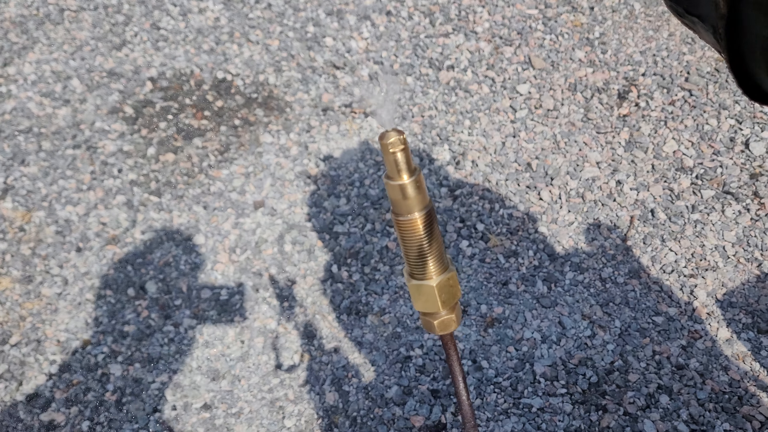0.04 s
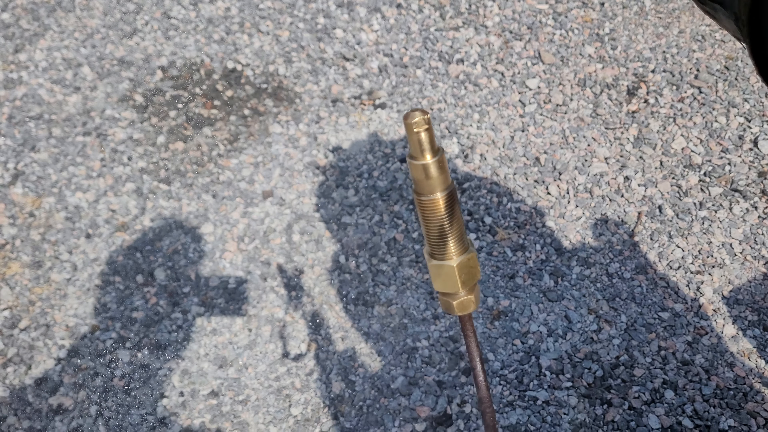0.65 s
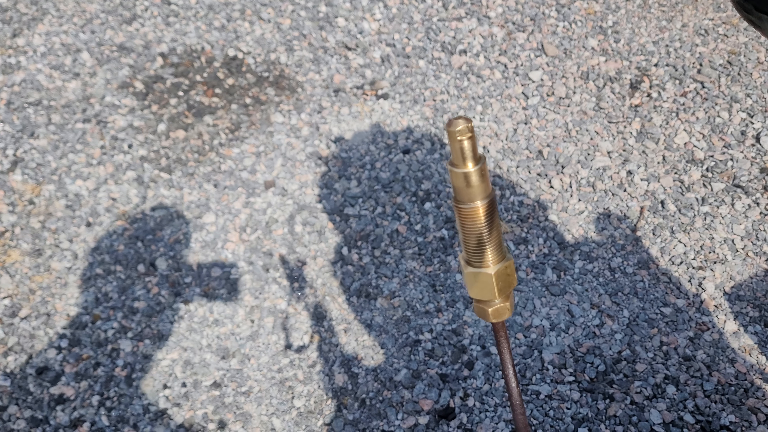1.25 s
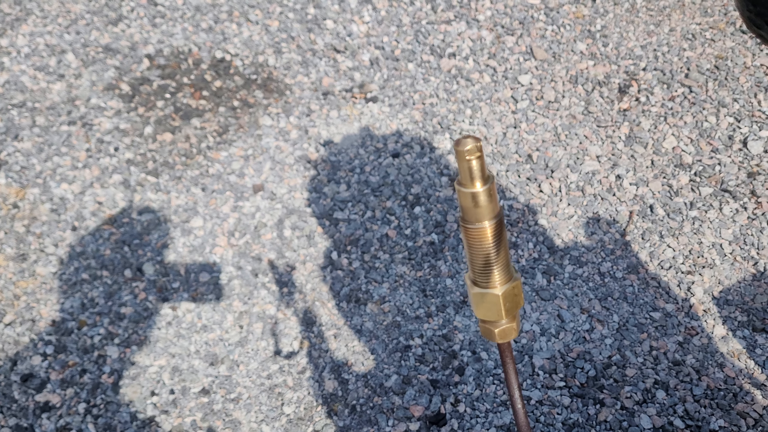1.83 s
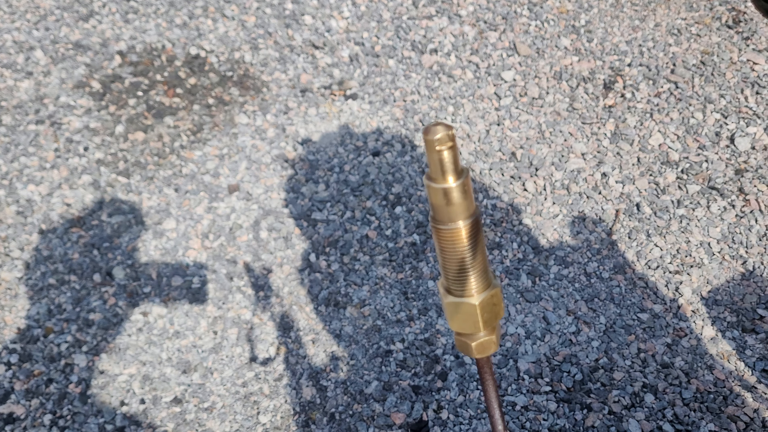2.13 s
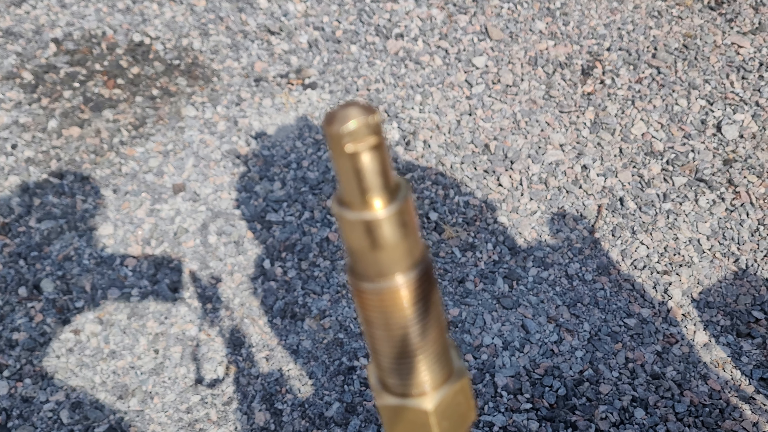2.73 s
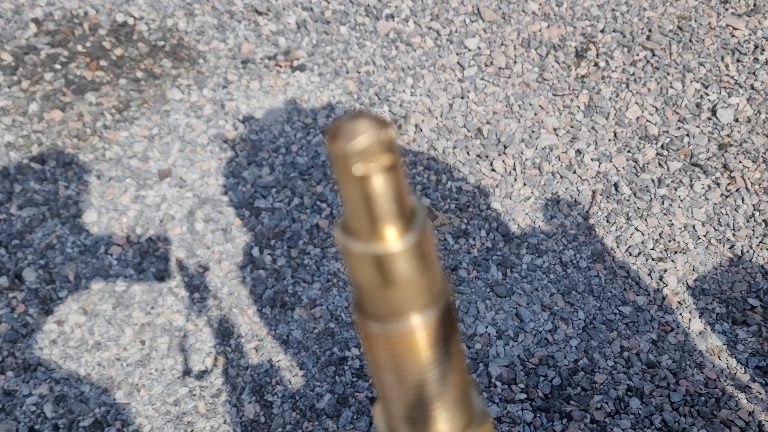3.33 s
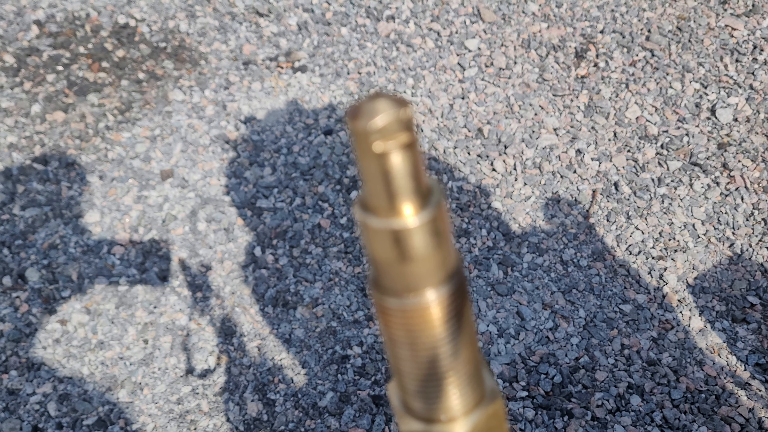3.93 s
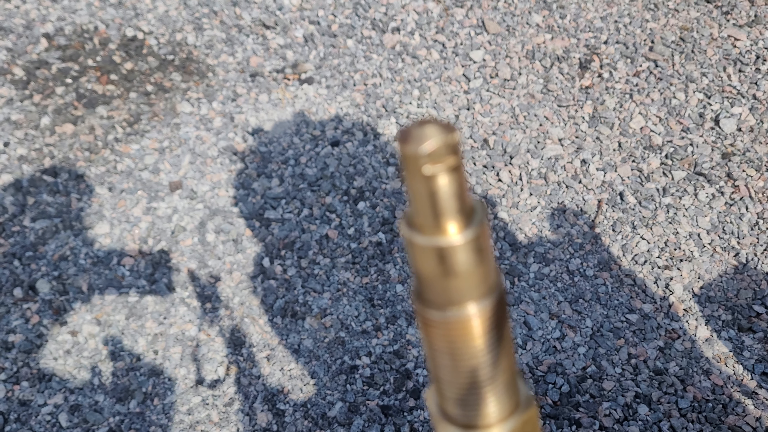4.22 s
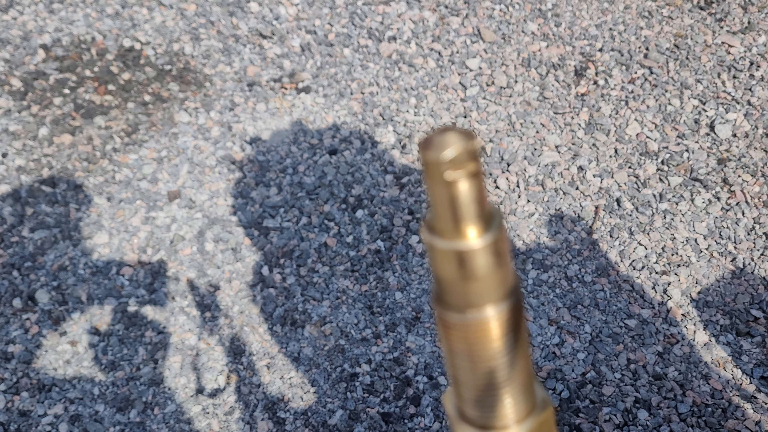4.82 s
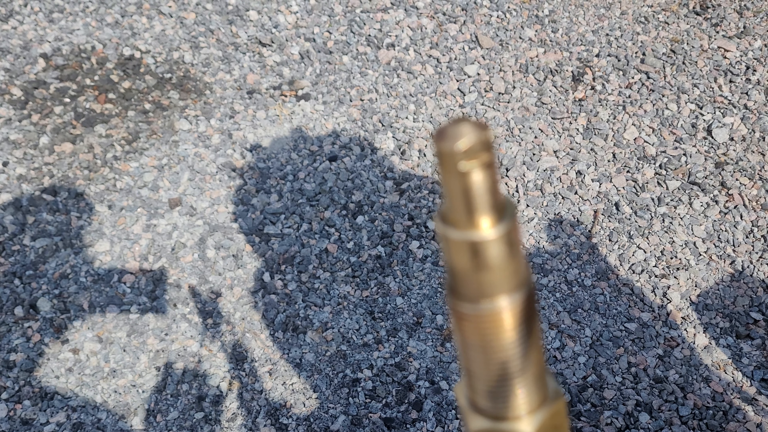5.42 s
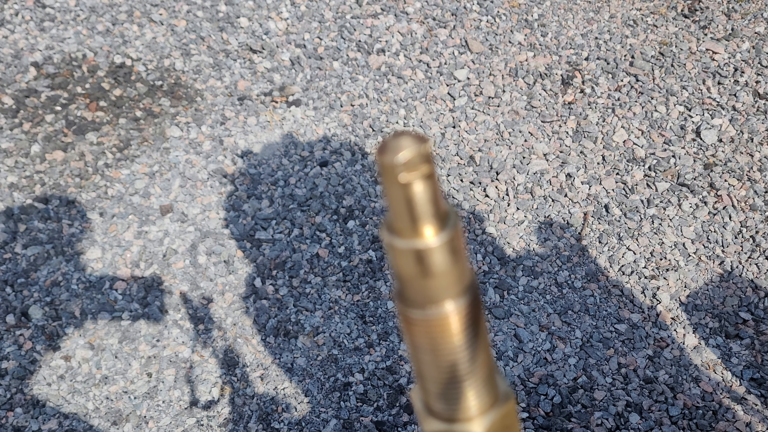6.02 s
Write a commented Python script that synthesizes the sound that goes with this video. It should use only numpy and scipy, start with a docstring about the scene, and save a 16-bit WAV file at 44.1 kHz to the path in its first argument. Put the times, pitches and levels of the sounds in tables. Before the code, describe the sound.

Outdoors, close to the microphone, a fuel injector on a hand pump opens with a metallic ping, gives a short, slightly rising squeal with a hiss of spray, and snaps shut. The pump lever clacks back with a few light ticks. The rest is a quiet yard: soft finger bumps on the microphone, a brief low buffet of wind, faint clothing rustle and barely audible birds and insects.

```python
"""A diesel injector popped once

On a hand test pump, outdoors over gravel, the needle cracks open with a ping, chatters in a short
rising squeal while fuel sprays, and snaps shut; the pump lever clacks back. Impacts excite free
vibration of the steel; the periodic bounces drive its resonances. Then a quiet yard: far birds and
insects, clothing, fingers shifting on the recorder's case, puffs of wind on its two microphones."""
import sys
import numpy as np
from scipy import signal
from scipy.fft import rfft, irfft, next_fast_len
from scipy.io import wavfile
from scipy.ndimage import uniform_filter1d

SR = 44100
rng = np.random.default_rng(int(sys.argv[2]) if len(sys.argv) > 2 else 0)


def store_wav(level_fs):
    """Save 16-bit WAV to argv[1]."""
    pcm = np.round(np.clip(np.atleast_2d(level_fs), -1, 1) * 32767)
    wavfile.write(sys.argv[1], SR, pcm.T.astype(np.int16))


N = 267246
T = np.arange(N) / SR
SIDES = np.array([[1], [-1]])  # left, right; a balance is left level minus right level
LIFT_S, SEAT_S = .151, .2865  # the needle chatters between these times

# Spectra of outdoor hush, cloth and fuel mist. Each row: frequency in Hz, spectral density in dB.
HUSH_SPECTRUM = [(20, -8), (55, 7.5), (110, -4), (180, -14.5), (300, -6.5), (500, -4), (800, -13.5),
                 (1200, -22.5), (2300, -20), (3700, -5), (5500, -19), (8000, -23.5), (11000, -29),
                 (15500, -33)]
CLOTH_SPECTRUM = [(100, -12.5), (310, -6), (600, -9.5), (1600, -15.5), (2600, -19.5), (5000, -15.5),
                  (10000, -32.5), (15000, -37.5)]
MIST_SPECTRUM = [(150, -13), (300, -3.5), (700, -4), (1800, -6.5), (3200, 1), (5000, -3.5), (8000, -8),
                 (11000, -2.5), (14000, 2), (16000, 4)]
# Direction of hush and mist. Each row: frequency in Hz, balance in dB.
HUSH_BALANCE = [(60, 2), (400, 9.5), (1200, 24), (3500, 7.5), (6000, -5), (12000, -7.5)]
MIST_BALANCE = [(1000, 0), (4000, -2), (8000, -1.5), (14000, -14)]
# Likeness of the two channels in hush and cloth. Each row: frequency in Hz, correlation.
YARD_CORRELATION = [(60, 0.45), (350, .55), (1200, 0.36), (3000, 0), (12000, 0)]
# Smooth swells of noise. Each row: peak time in seconds, level in dB, half-width in seconds.
PUFF_AND_RUSTLES = [(0, -55.5, 0.042), (.3, -71.5, 0.42), (1.5, -76.5, 0.19), (2.13, -75, 0.31),
                    (2.8, -70.5, 0.4), (4.15, -79, 0.17)]  # the first row is a brief puff of noise at the very start
FIZZES = [(.7, -69, 0.042)]
BREEZE = [(2.1, -67.5, 1.2)]
SLEEVE_SWISHES = [(2.17, -80.5, .2), (2.56, -82, .08), (2.93, -87, .14), (3.945, -77, .04)]
INSECT_SWELLS = [(5.12, -72, 0.33), (6.05, -78, 0.23)]
# The needle opens and shuts, the lever lands twice. Each row: start and T60 in seconds, crack level
# in dB, centre in Hz and balance in dB, sizzle level in dB and centre in Hz, thud level in dB.
METAL_CONTACTS = [(.075, 0.041, -39, 3600, -18, -32, 11500, -41.5),
                  (0.2884, 0.027, -23, 2050, -1.5, -36.5, 8000, -46),
                  (.6283, 0.038, -33.5, 1700, 16, -35.5, 13000, -49),
                  (0.6399, 0.024, -26, 2400, 1.5, -36.5, 6200, -53.5)]
# Modes of injector and pipe, of needle seat and nozzle, and of pump frame and lever.
# Each row: frequency in Hz, level in dB, T60 in seconds.
STEEL_MODES = [(830, -20, .25), (970, -14, .14), (1252, -17, .5), (1346, -5, .16), (1420, -11, .2),
               (1962, -9, .28), (2304, -7, .26), (2397, -9, .14), (3370, -13, .22), (3871, -15, .14),
               (4150, -7, .05), (4355, -9, .08), (4605, -11, .18), (4845, -13, .2), (5606, -9, .15),
               (6848, -4, .065), (8786, -14, .075), (9249, -5, .05), (10090, -2, .06), (11065, 2, .065),
               (11880, -10, .06), (12720, -11, .065), (13190, -5, .045), (13790, -6, .045),
               (14400, -8, .06), (15390, -7, .04)]
SEAT_MODES = [(3031, -24, .22), (3200, -7, .016), (3500, 0, .024), (3750, -8, .014)]
FRAME_MODES = [(226, -13, .2), (286, -6, .13), (374, -11, .34), (436, -14, .22), (526, -7, .12),
               (660, -15, .18), (732, -11, .1), (880, 5, .11), (1010, -9, .08), (1300, -9, .12),
               (1425, -8, .17), (1716, -6, .1), (2045, -1, .08), (2222, 3, .08), (2330, 3, .09),
               (2579, -7, .11), (2766, 0, .12), (3068, -5, .1), (4403, -3, .06), (4820, -8, .05),
               (5660, -9, .05)]
# Blows on those three bodies. Each row: start in seconds, level in dB, balance in dB.
STEEL_PINGS = [(0.077, -29, -8.5), (0.288, -56, 2.5), (0.6308, -57, 11)]
SEAT_SNAPS = [(0.2877, -17, 11.5)]
FRAME_KNOCKS = [(0.2891, -38.5, 1.5), (.629, -38.5, -7.5), (0.6399, -34, 4.5)]
# Decay of the echoes. Each row: frequency in Hz, T60 in seconds.
ECHO_T60 = [(100, .45), (400, .55), (1400, .3), (3000, .3), (6000, .22), (15000, .13)]
# Spectrum of the echoes. Each row: frequency in Hz, level in dB.
ECHO_SPECTRUM = [(100, -3.5), (400, -6), (1400, 4), (3000, -9.5), (6000, -7.5), (15000, -19)]
# Resonances that shape the squeal. Each row: centre and half-width in Hz, left and right levels
# in dB, phase lead of the left channel in radians.
INJECTOR_RESONANCES = [(1440, 27, -27.5, -15, 2.3), (1476, 13, -13.5, -24, 3.0), (1515, 19, -25.5, -26, .7),
                       (3010, 110, -35, -32, -1.3), (4370, 100, -29, -35, .6), (6030, 200, -52, -47, 0),
                       (7560, 150, -62, -56, 0), (8620, 140, -54, -41, 0), (9090, 100, -56, -48, 1.5),
                       (10100, 100, -51, -37, 0), (11620, 100, -39, -36, 1.2), (13030, 150, -42, -23, -.6),
                       (14350, 150, -43, -30, 1.5), (15110, 90, -45, -30, 1), (15680, 100, -48, -29, 0)]
# Puffs of wind, and single eddies that slap a microphone.
# Each row: centre time in seconds, peak level in dB, time scale in seconds, balance in dB.
GUSTS = [(.357, -55.5, .053, 4), (1.244, -58.5, 0.021, -28.5), (1.95, -59, 0.04, 20.5),
         (2.814, -43, 0.055, 6), (2.961, -25, 0.036, 33.5), (3.082, -53, 0.017, 22),
         (3.227, -46.5, 0.0091, 36), (3.303, -45, .049, 19), (4.171, -45.5, 0.0089, -7),
         (4.247, -53, 0.091, -16.5)]
EDDY_SLAPS = [(2.889, -29.5, 0.0019, 21), (2.922, -20, 0.00093, 44), (2.9474, -16, 0.00069, 44),
              (2.9724, -14, 0.0008, 45), (2.982, -17.5, 0.00088, 45), (4.173, -37.5, 0.0031, -25)]
# The pump's linkage. Each row: start in seconds, level in dB, T60 in seconds, balance in dB.
LINKAGE_TICKS = [(0.574, -43, 0.034, 5.5), (0.603, -45.5, .019, .5), (0.849, -53.5, .029, -4),
                 (.863, -56, .02, -6), (0.928, -56, 0.052, 3), (4.306, -59.5, 0.045, 7.5),
                 (5.524, -53.5, 0.063, 5.5)]
# Birds. Each row: peak time in seconds, level in dB, first and last pitch in Hz, half-width in seconds.
CHIRPS = [(1.317, -66, 4200, 4600, .025), (1.34, -65.5, 3400, 2900, 0.019), (2.701, -66, 4480, 4230, 0.014),
          (5.064, -67, 3880, 2900, 0.027)]
# Fingers on the case. Each row: peak time in seconds, level in dB, rise and fall time constants
# in seconds, relative level of the upper modes in dB.
TOUCHES = [(1.975, -33, 0.011, 0.014, -16), (2.12, -65, 0.11, 0.21, -14),
           (2.52, -53.5, 0.0017, 0.051, -6.5), (2.74, -57.5, 0.01, 0.049, -5),
           (4.027, -56, 0.00053, 0.045, -5)]
# Upper modes of the case. Each row: centre in Hz, bandwidth in Hz, level in dB.
CASE_MODES = [(720, 620, -1), (1650, 340, 1), (3230, 830, -1.5)]
# Fingernails on the case. Each row: start in seconds, level in dB, T60 in seconds.
NAIL_CLICKS = [(2.516, -47, 0.015), (4.028, -49, 0.023)]


def from_db(db):
    return 10 ** (np.asarray(db) / 20)


def unit_rms(x):
    return x / np.sqrt(np.mean(x ** 2) + 1e-20)


def at_hz(points, hz):
    """Interpolation on a logarithmic frequency axis."""
    frequencies, values = np.array(points).T
    return np.interp(np.log(np.maximum(hz, 1)), np.log(frequencies), values)


def pan(balance_db):
    """Left and right gains of constant total power."""
    return unit_rms(from_db(SIDES / 2 * balance_db))


def band_noise(low_hz, high_hz, shape=(2, N)):
    """White noise through a Butterworth band-pass."""
    sos = signal.butter(2, [max(low_hz, 10), min(high_hz, SR * .45)], "band", fs=SR, output="sos")
    return signal.sosfilt(sos, rng.standard_normal(shape))


def coloured_noise(spectrum, balance=None, correlation=None):
    """Spectrally shaped noise; the ratio of mid to side sets the correlation of the channels."""
    size = next_fast_len(N)
    hz = np.fft.rfftfreq(size, 1 / SR)
    mid, side = rfft(rng.standard_normal((2, size)))
    alike = 0 if correlation is None else np.clip(at_hz(correlation, hz), -1, 1)
    white = np.sqrt(1 + alike) * mid + SIDES * np.sqrt(1 - alike) * side
    level_db = at_hz(spectrum, hz) + (0 if balance is None else SIDES * at_hz(balance, hz) / 2)
    return unit_rms(irfft(white * from_db(level_db), size)[:, :N])


def drift(rate_hz):
    """Low-passed random fluctuation of unit rms."""
    pole = np.exp(-2 * np.pi * rate_hz / SR)
    return unit_rms(signal.lfilter([1], [1, -2 * pole, pole * pole], rng.standard_normal(N)))


def steadied(noise, span_s):
    """Division by the running rms holds short-term power near 1."""
    power = uniform_filter1d(noise ** 2, max(int(span_s * SR), 2))
    return noise / np.sqrt(np.abs(power) + 1e-12)


def bell(peak_s, span_s):
    """Gaussian envelope, down to 1/e at span_s from its peak."""
    return np.exp(-np.minimum(((T - peak_s) / span_s) ** 2, 20))


def swells(rows):
    """A sum of Gaussian envelopes."""
    return sum(from_db(db) * bell(peak_s, span_s) for peak_s, db, span_s in rows)


def add(out, start_s, sound):
    at = max(int(start_s * SR), 0)
    out[:, at:at + sound.shape[-1]] += sound[:, :N - at]


def burst(start_s, level_db, t60, balance_db, hz, octaves):
    """A brief contact excites a band of noise that decays exponentially."""
    out, t = np.zeros((2, N)), T[:SR // 4]
    noise = band_noise(hz / 2 ** (octaves / 2), hz * 2 ** (octaves / 2), (2, 2 * len(t)))
    noise = steadied(noise + .6 * noise[::-1], .0091)[:, len(t):]  # the channels partly share it
    envelope = from_db(level_db - 60 * t / t60) * (1 - np.exp(-t / .0002))
    add(out, start_s, pan(balance_db) * noise * envelope)
    return out


def yard_hush():
    """Distant outdoor sound merges into stationary noise."""
    return from_db(-69) * coloured_noise(HUSH_SPECTRUM, HUSH_BALANCE, YARD_CORRELATION)


def puff_and_clothing():
    """A brief puff of noise at the very start; then friction of cloth rustles and a sleeve hisses."""
    noise = coloured_noise(CLOTH_SPECTRUM, correlation=YARD_CORRELATION)
    puff = swells(PUFF_AND_RUSTLES[:1])
    rustle = from_db(-70.5) + swells(PUFF_AND_RUSTLES[1:])  # louder as the arms move
    sleeve = swells(SLEEVE_SWISHES) * unit_rms(band_noise(8000, 13500))
    return (puff + rustle) * noise + sleeve


def metal_contacts():
    """A hard impact has a broad spectrum: a crack, a sizzle above it and a longer thud."""
    out = np.zeros((2, N))
    for start, t60, crack_db, crack_hz, balance_db, sizzle_db, sizzle_hz, thud_db in METAL_CONTACTS:
        out += burst(start, crack_db, t60, balance_db, hz=crack_hz, octaves=1)
        out += burst(start, sizzle_db, t60, balance_db=-19, hz=sizzle_hz, octaves=1.25)
        out += burst(start, thud_db, t60=.34, balance_db=-10, hz=520, octaves=5)
    return out


def struck_metal(modes, blows, lead_rad):
    """Free vibration after a blow is a sum of damped modes, each reaching the left microphone first."""
    out, t = np.zeros((2, N)), T[:SR // 2]
    attack = 1 - np.exp(-t / .0005)
    for start, level_db, balance_db in blows:
        for k, (hz, mode_db, t60) in enumerate(modes):
            phase_shift = SIDES * lead_rad / 2 * min(hz / 1000, 1)
            wave = (-1) ** k * np.sin(2 * np.pi * hz * t + phase_shift)
            decay = from_db(level_db + mode_db - 60 * t / t60)
            add(out, start, pan(balance_db) * wave * decay * attack)
    return out


def echoes(direct):
    """Scattering from gravel and walls acts as convolution with a noise tail; the treble dies first."""
    t, tail = T[:SR * 3 // 4], 0
    for hz in 125 * 2. ** np.arange(8):
        noise = band_noise(hz / np.sqrt(2), hz * np.sqrt(2), (2, len(t)))
        tail += noise * from_db(at_hz(ECHO_SPECTRUM, hz) - 60 * t / at_hz(ECHO_T60, hz))
    return signal.fftconvolve(direct, tail * (1 - np.exp(-t / .0053)), axes=1)[:, :N]


def needle_motion():
    """Self-excited oscillation: the needle's bounce rate climbs with the flow, then levels off."""
    attack_db_per_s, release_db_per_s = 1698, 1617.5
    start_hz, climb_hz_per_s, top_hz = 1419, 1170, 1515
    open_db = np.minimum(attack_db_per_s * (T - LIFT_S), release_db_per_s * (SEAT_S - T))
    bounce_hz = np.minimum(start_hz + climb_hz_per_s * (T - LIFT_S), top_hz)
    jitter = 1 + .0018 * drift(600)
    phase = 2 * np.pi * np.cumsum(bounce_hz * jitter) / SR
    return np.clip(open_db, -200, 0), bounce_hz, phase


def squeal(open_db, bounce_hz, phase):
    """Forced vibration: each harmonic of the bounces swells as it sweeps through a resonance."""
    live = open_db > -70
    t, open_db, bounce_hz, phase = T[live], open_db[live], bounce_hz[live], phase[live]
    # level at 10 kHz: duller when barely open, and as the bounces soften late in the stroke
    treble_db = 1.2 * open_db - 238.5 * np.maximum(t - .23, 0)
    dip_db = -7 * np.exp(-((t - .194) / .006) ** 2)  # the fundamental dips briefly
    out = np.zeros((2, N))
    for k in range(1, 12):
        response = 0
        for hz, half_width, left_db, right_db, lead_rad in INJECTOR_RESONANCES:
            peak = from_db([[left_db], [right_db]]) * np.exp(.5j * lead_rad * SIDES)
            response += peak / (1 + ((k * bounce_hz - hz) / half_width) ** 2)
        shimmer_db = .21 * k * drift(200)[live]
        level_db = open_db + treble_db * k * bounce_hz / 10000 + shimmer_db + (dip_db if k == 1 else 0)
        out[:, live] += np.sqrt(2) * from_db(level_db) * np.real(response * np.exp(1j * k * phase))
    return out


def fuel_mist(open_db, phase):
    """Atomised fuel hisses, amplitude-modulated by the bounces and sagging as the pressure falls."""
    level_db = -31.5 + open_db - 29 * (T - LIFT_S)
    puffs = 1 + .4 * np.cos(phase)
    return from_db(level_db) * puffs * coloured_noise(MIST_SPECTRUM, MIST_BALANCE)


def nozzle_tip():
    """At the hardest bounces the tip rings at its natural frequency."""
    return from_db(-33) * pan(-6) * np.sin(2 * np.pi * 11075 * T) * bell(.195, .023)


def wind():
    """Turbulent pressure buffets each microphone separately; stronger puffs hold faster eddies."""
    force = pan(3) * swells(BREEZE) * from_db(7 * drift(rate_hz=4.9))
    for peak_s, level_db, span_s, balance_db in GUSTS:
        force += pan(balance_db) * from_db(level_db) * np.exp(-np.minimum(np.abs(T - peak_s) / span_s, 20))
    corner_hz = 85 * (force / from_db(-41.5) + .23) ** .22
    slope_db_per_octave, low_hz = 17, 41.62
    out = np.zeros((2, N))
    for hz in 45 * 2. ** np.arange(5):
        eddies = steadied(band_noise(hz / np.sqrt(2), hz * np.sqrt(2)), 4 / hz)
        treble_loss = from_db(2 * slope_db_per_octave * np.log2(hz / corner_hz))
        bass_loss = (low_hz / hz) ** 4  # larger eddies press on the microphone less and less
        out += force * eddies / np.sqrt(1 + treble_loss + bass_loss)
    for centre_s, level_db, span_s, balance_db in EDDY_SLAPS:  # a passing eddy sucks, then pushes
        age = (T - centre_s) / span_s
        out += pan(balance_db) * from_db(level_db) * age * np.exp(-np.minimum(age ** 2 - 1, 100) / 2)
    return signal.sosfiltfilt(signal.butter(4, 1150, fs=SR, output="sos"), out)


def linkage():
    """Light impacts in the pump's linkage give damped transients: a tick and a lower knock."""
    return sum(burst(start, db, t60, balance_db, hz=970, octaves=.91)
               + burst(start, db - 5.5, t60, balance_db, hz=520, octaves=1.1)
               for start, db, t60, balance_db in LINKAGE_TICKS)


def fizz():
    """Faint high-frequency noise swells after the lever's return."""
    return swells(FIZZES) * pan(-6) * unit_rms(band_noise(6000, 21000))


def birds():
    """Far chirps are short glides; random frequency modulation gives the blur of distance."""
    out = np.zeros(N)
    for peak_s, level_db, first_hz, last_hz, span_s in CHIRPS:
        glide_hz = np.interp(T, [peak_s - span_s, peak_s + span_s], [first_hz, last_hz])
        phase = 2 * np.pi * np.cumsum(glide_hz * (1 + .06 * drift(500))) / SR
        out += from_db(level_db) * bell(peak_s, span_s) * np.sin(phase)
    return pan(3.3) * out


def fingers():
    """Friction and taps of skin excite the case: its lowest mode hums and its upper modes rasp."""
    hum_hz, hum_width_hz = 275.3, 65.4
    hum = steadied(band_noise(hum_hz - hum_width_hz / 2, hum_hz + hum_width_hz / 2, N), .018)
    rasp = unit_rms(sum(from_db(db) * band_noise(hz - width / 2, hz + width / 2)
                        for hz, width, db in CASE_MODES))
    out = np.zeros((2, N))
    for peak_s, level_db, rise_s, fall_s, upper_db in TOUCHES:
        distance = np.maximum((peak_s - T) / rise_s, (T - peak_s) / fall_s)  # in time constants
        pressure = np.exp(-np.minimum(distance, 20))
        out += from_db(level_db) * pressure * (hum + from_db(upper_db) * rasp)
    return out


def fingernails():
    """A nail's impact on the case gives a narrow-band click over a duller, broader knock."""
    return sum(burst(start, db, t60, balance_db=11, hz=3250, octaves=.39)
               + burst(start, db - 8.5, t60, balance_db=11, hz=1480, octaves=2.6)
               for start, db, t60 in NAIL_CLICKS)


def insects():
    """Far insects blend into narrow-band noise that swells and fades."""
    return swells(INSECT_SWELLS) * pan(6.3) * unit_rms(band_noise(3240, 4400))


def scene():
    """The sources add by superposition; injector, pump and fingernail clicks are given echoes."""
    open_db, bounce_hz, phase = needle_motion()
    rig = squeal(open_db, bounce_hz, phase) + fuel_mist(open_db, phase) + nozzle_tip()
    rig += fizz() + metal_contacts() + linkage()
    rig += struck_metal(STEEL_MODES, STEEL_PINGS, lead_rad=1.2)
    rig += struck_metal(SEAT_MODES, SEAT_SNAPS, lead_rad=1.92)
    rig += struck_metal(FRAME_MODES, FRAME_KNOCKS, lead_rad=2.44)
    near = rig + fingernails()
    reflected = from_db(-45) * echoes(near)
    return near + reflected + fingers() + wind() + birds() + yard_hush() + insects() + puff_and_clothing()


def record(dry):
    """Band limiting removes the deepest rumble and the highest treble."""
    dry = signal.sosfilt(signal.butter(4, 38, "high", fs=SR, output="sos"), dry)
    return signal.sosfilt(signal.ellip(10, .2, 80, 15900, fs=SR, output="sos"), dry)


dry = scene()
out = record(dry)
store_wav(out)
```